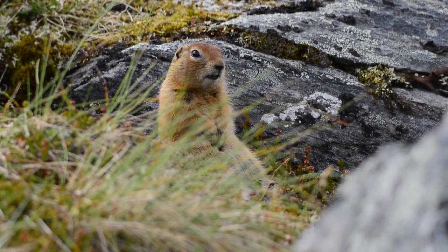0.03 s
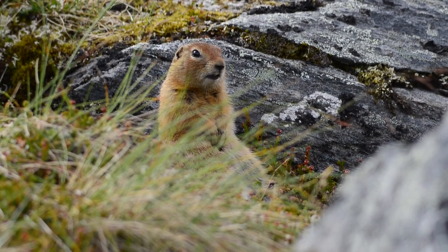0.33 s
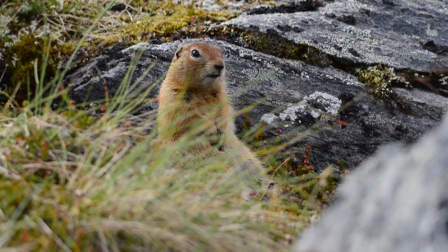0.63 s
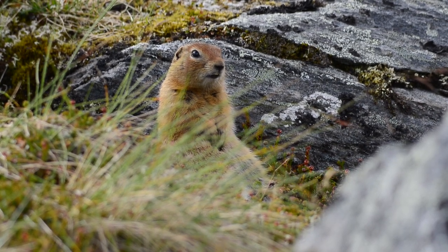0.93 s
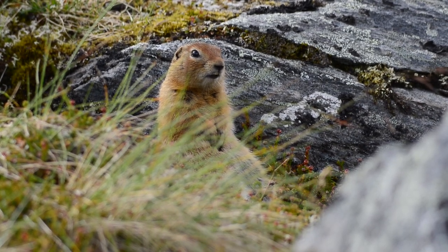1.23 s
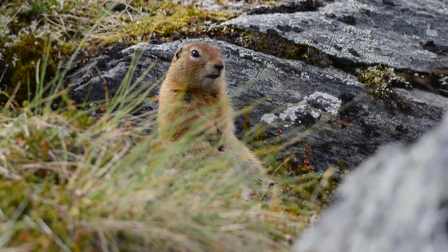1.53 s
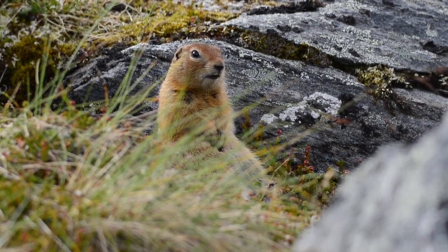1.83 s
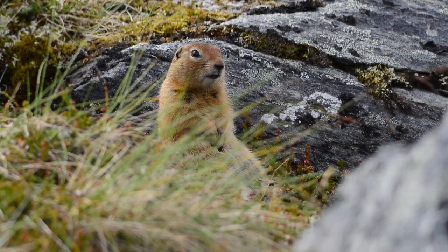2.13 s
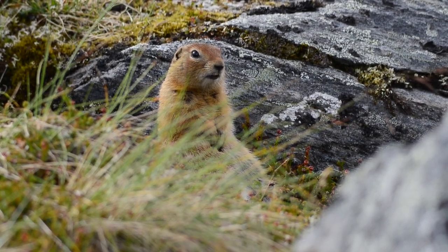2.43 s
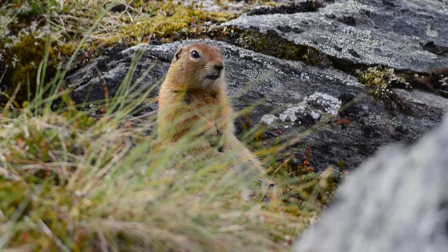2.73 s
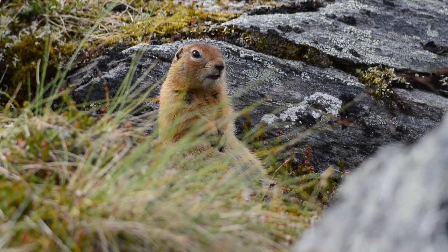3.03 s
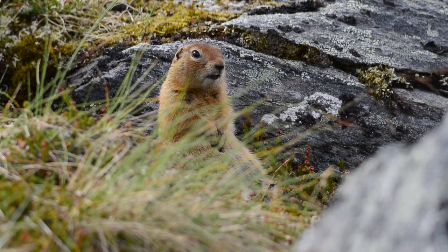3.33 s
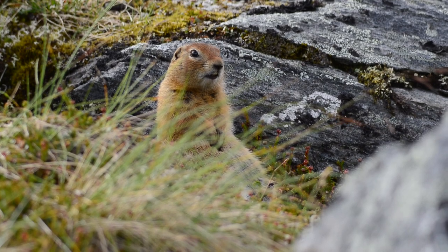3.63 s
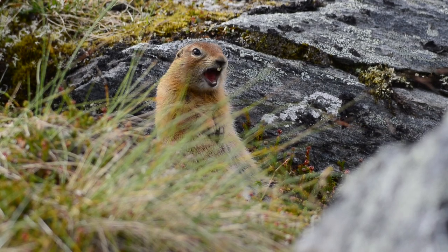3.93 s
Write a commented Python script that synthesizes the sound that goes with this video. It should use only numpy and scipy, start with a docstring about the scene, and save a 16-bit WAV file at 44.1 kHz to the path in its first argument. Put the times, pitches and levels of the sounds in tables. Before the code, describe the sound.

Outdoors on a rocky, grassy slope, a ground squirrel calls after a stretch of quiet hiss and uneven wind buffeting the microphone. Its short, whistling chirp has a faint echo and is followed at once by the start of a raspier one.

```python
"""Ground squirrel in gusty wind

A ground squirrel gives one sharp, arching chirp and starts a second, raspy one: a slower vibration
in its throat modulates the whistle. The rocks scatter back a faint echo. Before the call, turbulent
gusts rumble on the microphone and single eddies thump against it, over a quiet hiss."""
import sys
import numpy as np
from scipy import signal
from scipy.fft import rfft, irfft, next_fast_len
from scipy.io import wavfile
from scipy.ndimage import map_coordinates

SR = 44100
rng = np.random.default_rng(int(sys.argv[2]) if len(sys.argv) > 2 else 0)


def pcm_store(signal):
    """Save signal as 16-bit PCM."""
    levels = np.round(np.clip(np.atleast_2d(signal), -1, 1) * 32767)
    wavfile.write(sys.argv[1], SR, levels.astype(np.int16).T)


N = 176400


def squirrel():
    """Two calls, each a gliding tone whose pitch contour sets how pure or raspy it is."""
    # the arching whistle: (time [s], pitch [Hz], level [dB])
    first_chirp = [(3.9167, 4080, -33), (3.9185, 4870, -12.5), (3.921, 5280, -12.5), (3.926, 5540, -10.5),
                   (3.931, 5780, -13.5), (3.9365, 5800, -10), (3.942, 5885, -13.5), (3.950, 5820, -10),
                   (3.956, 5640, -14), (3.9615, 5160, -9), (3.965, 4200, -17), (3.969, 3630, -30),
                   (3.972, 3320, -53)]
    # the low start of the next: (time [s], pitch [Hz], level [dB])
    second_chirp = [(3.991, 3140, -38), (3.993, 3555, -21), (3.9955, 3884, -14), (4.0, 4097, -12)]
    return chirp(first_chirp) + chirp(second_chirp)


def chirp(contour):
    """Frequency and amplitude modulation by a slower throat vibration add rasping sidebands at low pitch."""
    # harmonics 1 to 3: (level when clear [dB], gain per unit of rasp [dB])
    harmonics = [(-0.5, -4), (-6, 16.5), (-36, 38)]
    # breath noise: (frequency [Hz], level [dB])
    breath_spectrum = [(2000, -41), (4000, -6), (6000, 3), (9500, 9), (12000, -3), (15500, -23)]
    clear_hz, hoarse_hz = 5060, 3880  # no rasp above the first pitch, full rasp below the second
    rasp_max, rasp_hz, swing_hz = 0.39, 830, 1250  # greatest depth, rate, pitch swing per unit of rasp
    jitter, jitter_hz, breath_db = 0.0026, 900, -34
    t = np.arange(N) / SR
    pitch, level_db = curves(contour)
    rasp = rasp_max * np.clip((clear_hz - pitch) / (clear_hz - hoarse_hz), 0, 1)
    modulation = rasp * np.sin(2 * np.pi * rasp_hz * t)
    frequency = pitch * (1 + jitter * wobble(jitter_hz)) + swing_hz * modulation
    phase = 2 * np.pi * np.cumsum(frequency) / SR
    whistle = sum(amp(db + gain_db * rasp) * np.sin(k * phase)
                  for k, (db, gain_db) in enumerate(harmonics, 1))
    voice = np.sqrt(2) * (1 + modulation) * whistle
    breath = amp(breath_db) * noise(breath_spectrum)
    sounding = (t >= contour[0][0]) & (t <= contour[-1][0])
    return sounding * amp(level_db) * (voice + breath)


def rock_echo(call):
    """Diffuse scattering: the stony slope's many reflections form a decaying, noisy impulse response."""
    # colour of the echo: (frequency [Hz], gain [dB])
    echo_colour = [(3000, -32), (5800, 5.5), (9000, -4), (12000, -14)]
    scatter_db, t60_s = -17, 0.62  # level before colouring, time to decay by 60 dB
    t = np.arange(SR // 4) / SR
    response = rng.standard_normal(len(t)) * amp(-60 * t / t60_s)
    response *= amp(scatter_db) / np.linalg.norm(response)
    return coloured(signal.fftconvolve(call, response)[:N], echo_colour)


def eddies():
    """Convected pressure pulses: the faster an eddy passes, the higher its thump. The hardest also crack."""
    # eddies striking the microphone: (time [s], envelope peak [dB], centre frequency [Hz])
    impacts = [(0.1185, -24, 116), (0.583, -28, 79.6), (0.632, -18, 107), (1.0318, -21.5, 92),
               (1.0703, -24.5, 158), (1.0951, -13, 121), (1.1015, -14.5, 98), (1.1223, -19, 139),
               (1.3826, -12.5, 104), (2.0637, -10.5, 86), (2.2956, -14.5, 111), (2.3217, -15, 132),
               (2.3303, -12, 215), (2.333, -18, 426), (2.364, -22, 177), (2.4842, -9, 164),
               (2.495, -4, 250), (2.5029, -13, 164), (2.5148, -17, 340), (2.556, -13, 112),
               (2.562, -7, 197), (2.5653, -5.5, 343), (2.5756, -13, 175), (2.6245, -4.5, 172),
               (2.65, -14, 93), (2.6646, -6, 216), (3.021, -30, 143), (3.23, -19.5, 134),
               (3.2937, -13, 184), (3.304, -12, 152), (3.3138, -30, 76), (3.3354, -16.5, 137),
               (3.3575, -17.5, 111), (3.3747, -4.5, 385), (3.5905, -5.5, 210), (3.706, -20.5, 234),
               (3.7563, -12, 150)]
    full_crack_db, crack_hz = -20, 1430
    knee_db, fade = -3, 5.4  # the crack loses `fade` dB for each dB an eddy falls below the knee
    t, pressure = np.arange(N) / SR, np.zeros(N)
    phases = rng.uniform(0, 2 * np.pi, len(impacts))  # set how lopsided each pulse is
    for (time_s, db, hz), phase in zip(impacts, phases):
        near = abs(t - time_s) < .1
        lag = t[near] - time_s
        thump = amp(db) * pressure_pulse(lag, hz)
        crack = amp(full_crack_db - fade * max(knee_db - db, 0)) * pressure_pulse(lag, crack_hz)
        pressure[near] += (np.exp(1j * phase) * (thump + crack)).real
    return pressure


def pressure_pulse(t, hz):
    """One pressure swing as an analytic signal; its duration is inverse to its centre frequency."""
    smoothness = 2.58  # larger: a rounder thump with less treble
    return (1 - 2j * np.pi * hz * t / smoothness) ** -smoothness


def wind_rumble():
    """Turbulent pressure on the microphone: low, lumpy noise that follows the gusts."""
    # strength of the gusts: (time [s], level [dB])
    gusts = [(0, -47.5), (.3, -45.5), (.4, -52), (.45, -40.5), (.5, -48), (.6, -43), (.7, -49.5),
             (.98, -51), (1.08, -29), (1.17, -52), (1.45, -47.5), (1.96, -51), (2.04, -38.5), (2.3, -30),
             (2.44, -35), (2.6, -24), (2.7, -29.5), (2.78, -36.5), (2.92, -36.5), (3.02, -27), (3.1, -39),
             (3.3, -23), (3.45, -44), (3.56, -39.5), (3.7, -27.5), (3.83, -26.5), (3.9, -39.5), (4, -51)]
    # turbulence: (frequency [Hz], level [dB])
    rumble_spectrum = [(15, -28), (30, -2.5), (55, 2.5), (115, -3), (180, -12), (300, -21.5), (500, -32),
                       (1000, -52), (3000, -100)]
    buffet_db, buffet_hz = 4, 30.34  # depth and rate of the lumps
    wind_db, = curves(gusts)
    turbulence = noise(rumble_spectrum) * amp(buffet_db * wobble(buffet_hz))
    return amp(wind_db) * unit(turbulence)


def air_hiss():
    """Broadband ambient noise of the open air, steady but for one brief dip."""
    # hiss envelope: (time [s], level [dB])
    hiss_levels = [(0, -47.5), (2.49, -47.5), (2.59, -48.5), (2.65, -51.5), (2.72, -47.5), (4, -48)]
    # hiss colour: (frequency [Hz], level [dB])
    hiss_spectrum = [(20, -6), (150, 0), (300, 0.5), (550, -1.5), (900, -2.5), (2000, -7.5), (2600, -10),
                     (5500, -15.5), (10000, -17.5), (15500, -20.5)]
    level_db, = curves(hiss_levels)
    return amp(level_db) * noise(hiss_spectrum)


def high_lisp():
    """Narrow-band noise under a Gaussian envelope, heard as a faint, brief lisp."""
    peak_s, width_s, peak_db = 2.712, 0.028, -57.5
    centre_hz, width_hz = 8800, 650
    band = filtered(rng.standard_normal(N), lambda hz: np.exp(-.5 * ((hz - centre_hz) / width_hz) ** 2))
    swell = np.exp(-.5 * ((np.arange(N) / SR - peak_s) / width_s) ** 2)
    return amp(peak_db) * unit(band) * swell


def amp(db):
    """Decibels to amplitude ratio."""
    return 10 ** (np.asarray(db) / 20)


def unit(x):
    """Normalisation to rms 1."""
    return x / np.sqrt(np.mean(x ** 2) + 1e-20)


def curves(rows):
    """Linear interpolation, per sample, of each column after the time."""
    times, *columns = np.transpose(rows)
    return [np.interp(np.arange(N) / SR, times, column) for column in columns]


def wobble(rate):
    """Smooth random fluctuation: a spline through `rate` knots a second."""
    knots = rng.standard_normal(int(N * rate / SR) + 4)
    return map_coordinates(knots, [np.arange(N) * rate / SR])


def filtered(x, response):
    """Linear filtering: the spectrum of x times a frequency response."""
    size = next_fast_len(N + SR // 2)
    return irfft(rfft(x, size) * response(np.fft.rfftfreq(size, 1 / SR)), size)[:N]


def coloured(x, points):
    """Spectral shaping by (frequency [Hz], gain [dB]) points on a log frequency axis."""
    freqs, db = np.transpose(points)
    return filtered(x, lambda hz: amp(np.interp(np.log(hz + 1), np.log(freqs + 1), db)))


def noise(points):
    """Gaussian noise of rms 1 with the given spectral shape."""
    return unit(coloured(rng.standard_normal(N), points))


def scene():
    """Superposition of wind and hiss, the squirrel and its echo."""
    air = eddies() + air_hiss() + high_lisp() + wind_rumble()
    call = squirrel()
    return (air + call + rock_echo(call))[None]


def record(dry):
    """Band limiting: the microphone rolls off the deepest bass and nothing passes above the top limit."""
    low_cut_hz, top_hz = 26, 15850
    return filtered(dry[0], lambda hz: (hz < top_hz) * hz ** 2 / np.hypot(hz ** 2, low_cut_hz ** 2))[None]


dry = scene()
out = record(dry)
pcm_store(out)
```